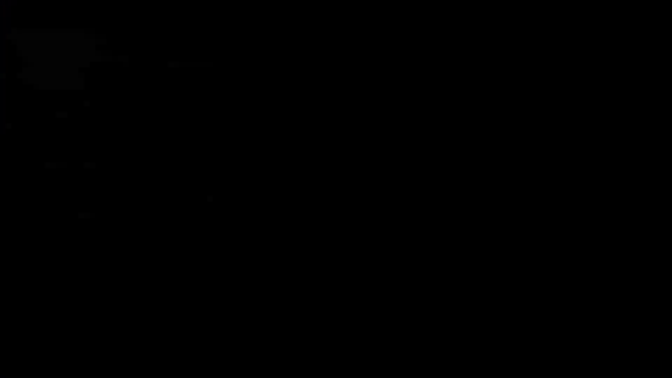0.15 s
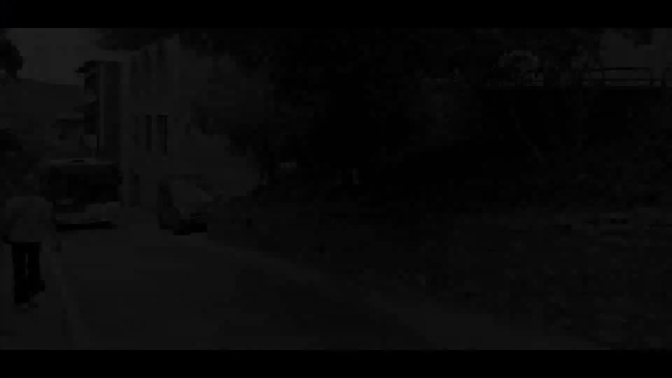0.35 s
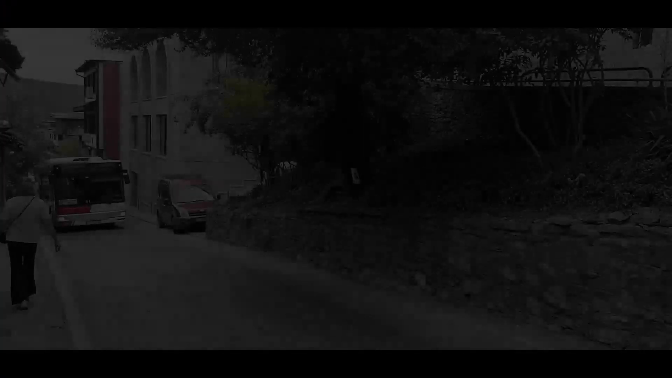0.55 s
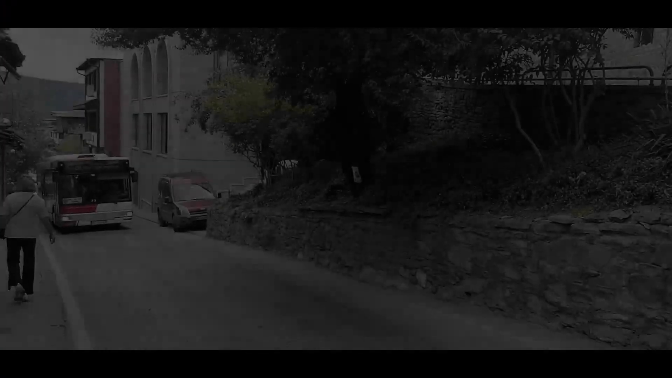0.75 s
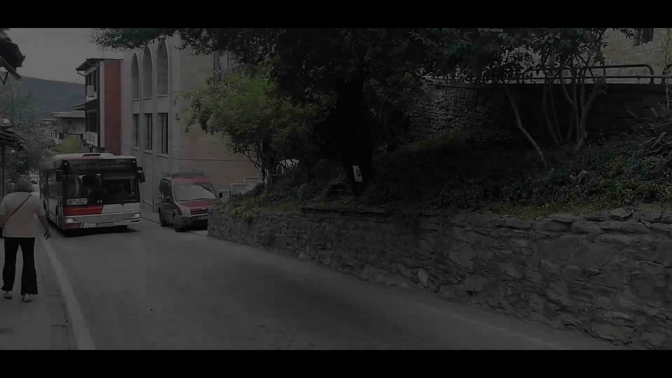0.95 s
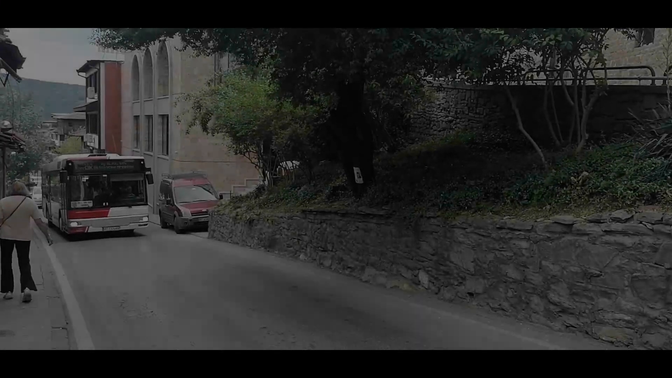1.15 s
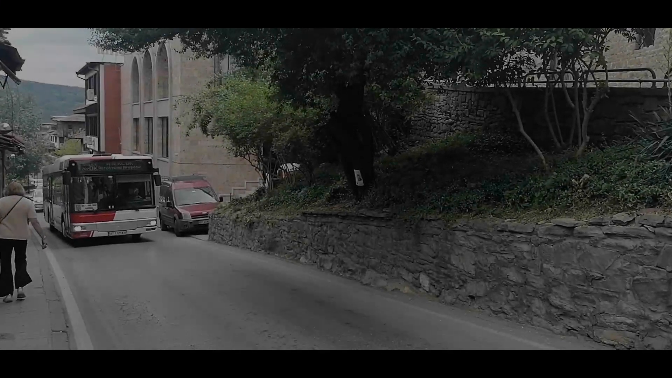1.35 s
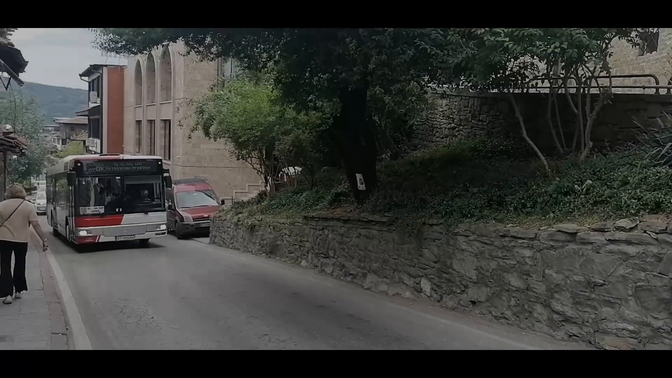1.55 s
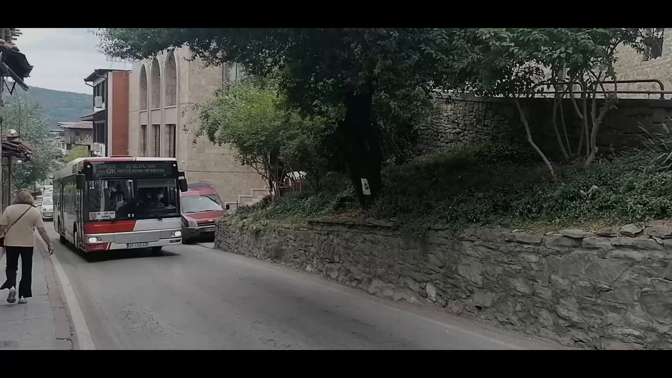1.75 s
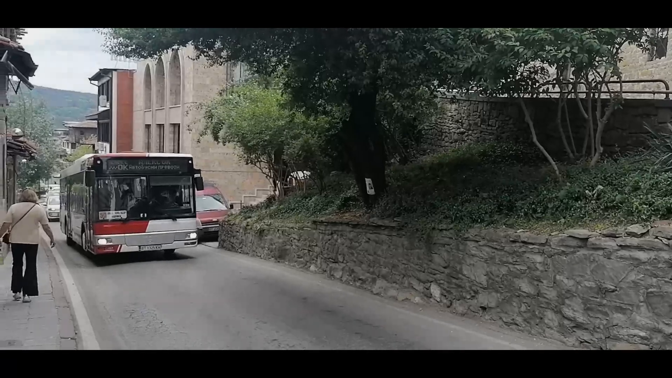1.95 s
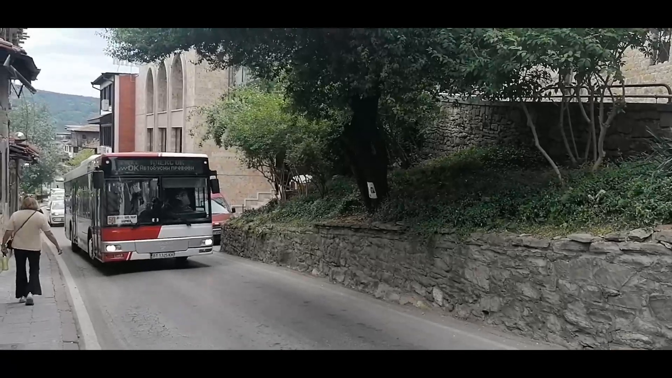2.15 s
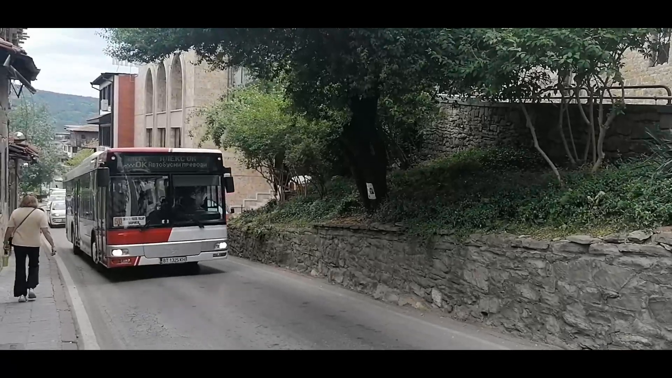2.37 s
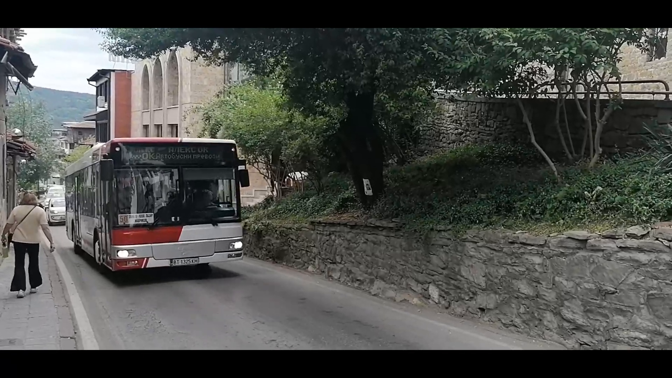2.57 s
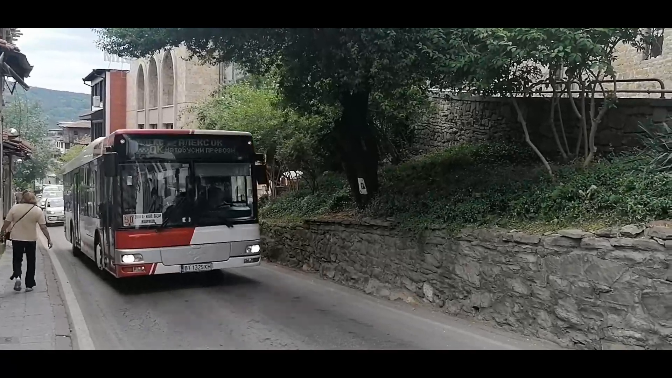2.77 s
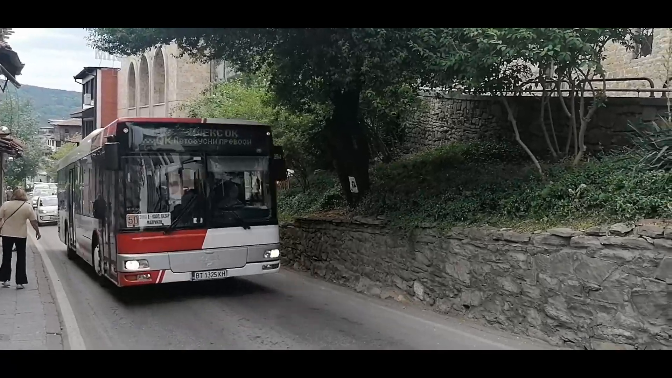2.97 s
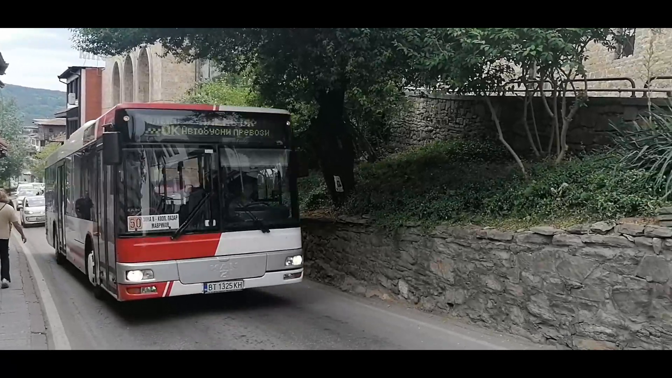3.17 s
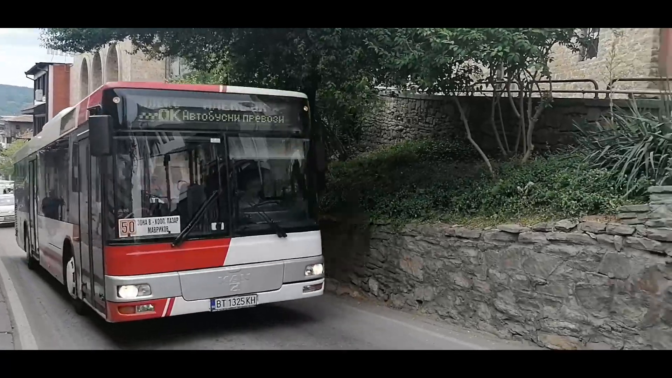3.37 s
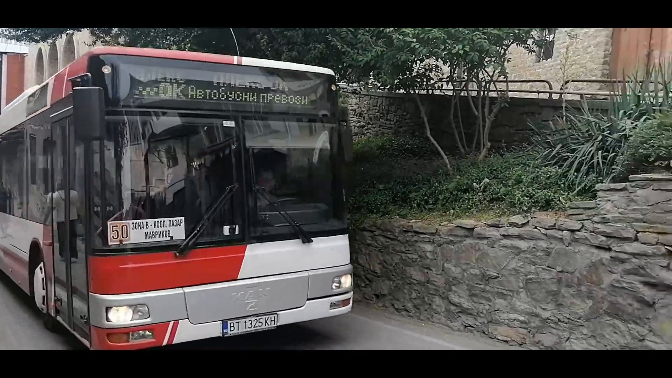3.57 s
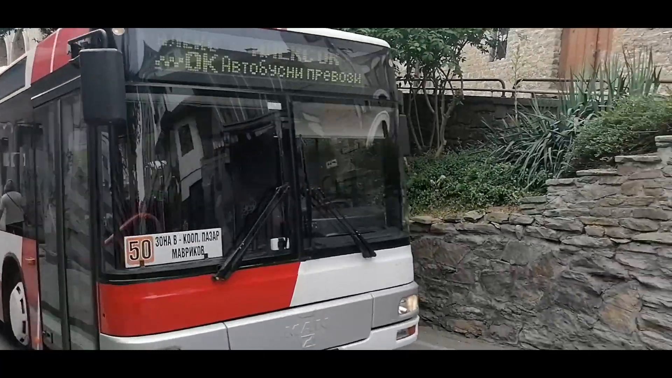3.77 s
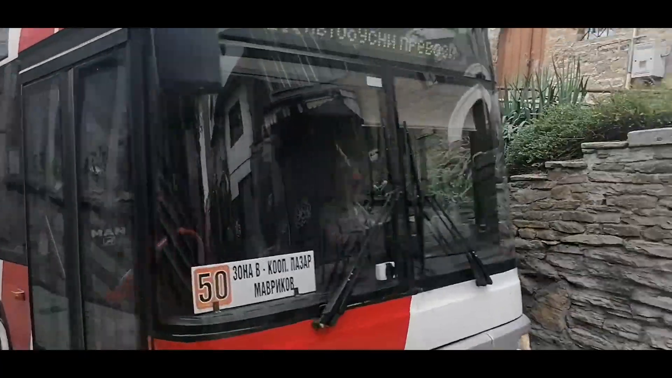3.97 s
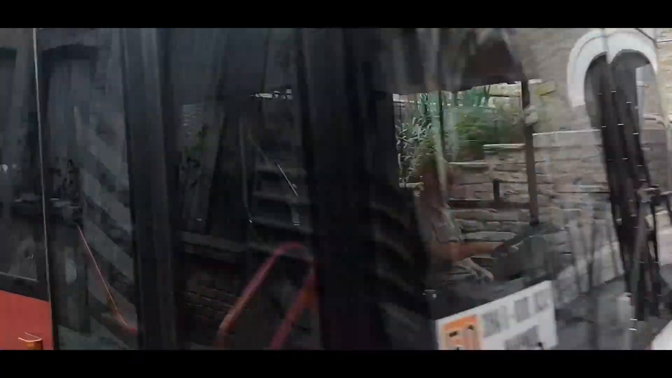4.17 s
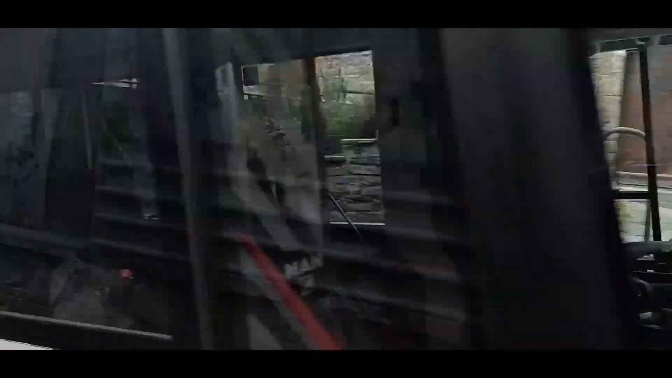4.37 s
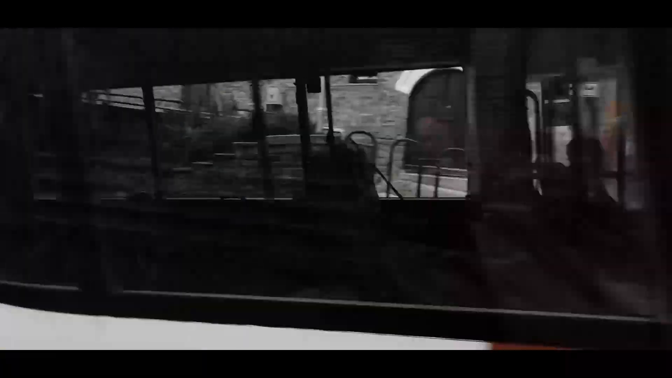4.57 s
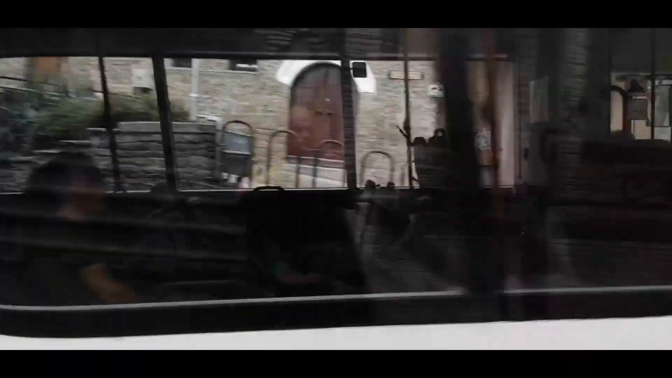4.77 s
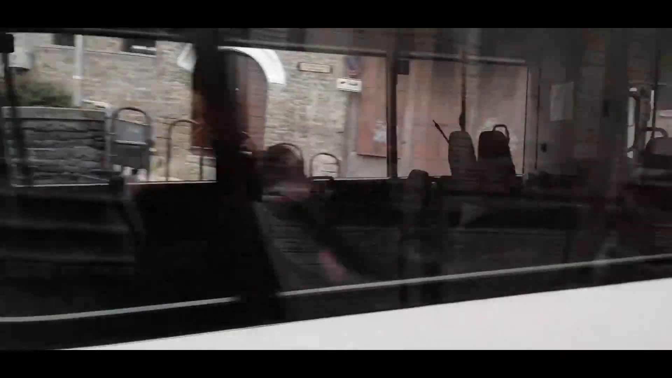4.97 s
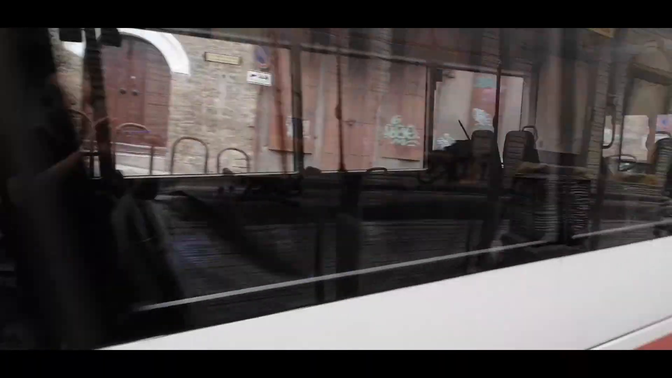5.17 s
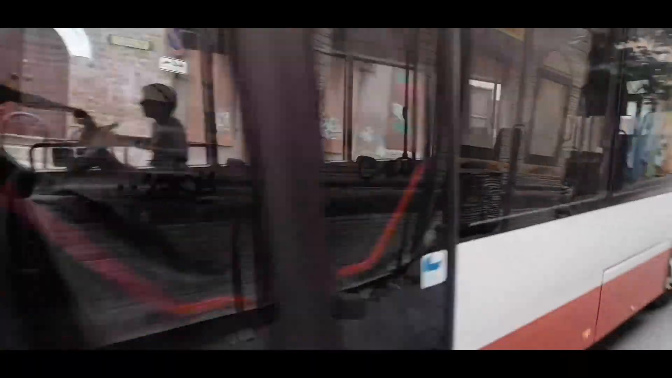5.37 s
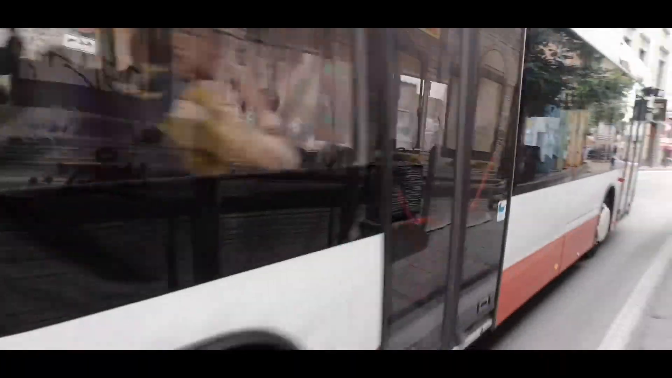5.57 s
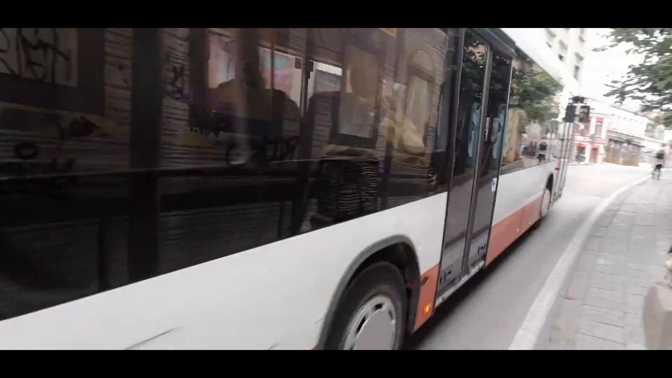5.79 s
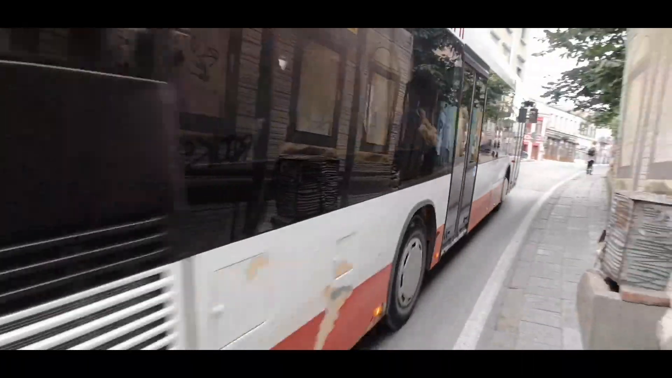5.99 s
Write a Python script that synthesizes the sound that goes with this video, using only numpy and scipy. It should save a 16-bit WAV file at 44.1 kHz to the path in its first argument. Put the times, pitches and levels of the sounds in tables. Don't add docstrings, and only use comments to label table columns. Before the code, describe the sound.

The sound begins in silence and fades in over about two seconds. A diesel bus is heard some way ahead on a narrow street with stone walls: a low uneven engine throb, a mid-low gear whine that flutters and drops out as echoes shift, soft tyre rumble, airy intake hiss and a very faint high whistle around 0.9. Revs climb slowly until about 2.3; small stone knocks tick at 1.5 and 1.7. Around 2.7 it changes up and the engine note drops, then holds steady. At 3.7 an air valve cracks, spits and bleeds off briefly. From 4 the flank is alongside: wide, loud tyre roar, hollow underbody resonances and brief panel singing, with a sharp stone knock at 4.6. From 5.2 cooling-fan wash grows, joined by a low boom at 5.5 as the rear passes. It stops at 6 while still loud. Close stereo pavement microphone, lightly reverberant.

```python
import sys
import numpy as np
from scipy import signal
from scipy.fft import rfft, irfft, next_fast_len
from scipy.io import wavfile
from scipy.ndimage import uniform_filter1d

SR = 44100
rng = np.random.default_rng(int(sys.argv[2]) if len(sys.argv) > 2 else 0)


def gain_from_decibels(decibels):
    exponent = np.asarray(decibels, float) / 20
    return 10 ** exponent


def master(y):
    cut = np.clip(np.atleast_2d(y).T, -1, 1)
    pcm = np.round(cut * 32767)
    wavfile.write(sys.argv[1], SR, pcm.astype(np.int16))


N = 265923
T = np.arange(N) / SR
SIZE = next_fast_len(N + 64)
HZ = np.maximum(np.arange(SIZE // 2 + 1) * SR / SIZE, 1)
ARRIVE_S, ARRIVE_LENGTH_S = 3.95, .5
FAR = np.clip(.5 - (T - ARRIVE_S) / ARRIVE_LENGTH_S, 0, 1)


def columns(table):
    s, *rest = np.transpose(table)
    return [np.interp(T, s, c) for c in rest]


def on_log(table, hz):
    f, v = np.transpose(table)
    return np.interp(np.log(hz), np.log(f), v)


def humps(table):
    s, half, *rest = np.transpose(table)
    bells = np.exp(-((T - s[:, None]) / half[:, None]) ** 2)
    return [c @ bells for c in rest]


def walk(rate_hz):
    k = int(SR / rate_hz)
    held = np.repeat(rng.standard_normal(N // k + 1), k)
    return 1.3 * uniform_filter1d(uniform_filter1d(held, k), k)[:N]


# (frequency [Hz], correlation [0-1])
PORT_LIKENESS = [(60, .98), (300, .96), (500, .82), (750, .78), (1000, .56), (1650, .6), (2100, .33),
                 (2450, .42), (3000, .22), (4000, .12), (15000, .1)]


def band(shape):
    used = np.flatnonzero(shape > 1e-4 * np.max(shape))
    left, other = (rng.standard_normal((2, len(used), 2)) @ [1, 1j]) * shape[used]
    like = np.clip(on_log(PORT_LIKENESS, HZ[used]), 0, 1)
    pair = np.zeros((2, len(HZ)), complex)
    pair[0, used] = left
    pair[1, used] = like * left + np.sqrt(1 - like ** 2) * other
    pair = irfft(pair, SIZE)[:, :N]
    return pair / pair[0].std()


def tone(turns, db, waver_db, slip_turns, rate_hz):
    level = np.sqrt(2) * gain_from_decibels(db + waver_db * walk(rate_hz))
    return level * np.sin(2 * np.pi * (turns + slip_turns * walk(rate_hz) + rng.random()))


def bursts(table):
    out = 0
    for s, rise_s, decay_s, hz, width_hz, db in table:
        swell = np.clip((T - s) / rise_s, 0, 1) * np.exp(-np.maximum(T - s - rise_s, 0) / decay_s)
        out = out + gain_from_decibels(db) * swell * band(np.exp(-((HZ - hz) / width_hz) ** 2))
    return out


def shifted():
    shift_s, length_s = 2.7, .53
    return np.clip((T - shift_s) / length_s + .5, 0, 1)


# (time [s], firing rate [Hz])
REVS = [(0.2, 74.4), (1.3, 82.3), (2.25, 84.7), (2.45, 82.2), (2.9, 68.2), (3.1, 67.7), (4.5, 69),
        (5.1, 69), (5.9, 67)]
# (time [s], level [dB])
FIRING = [(.2, -39), (.7, -39.5), (1, -41.5), (1.35, -38), (1.65, -42.5), (2.25, -32), (2.95, -38.5),
          (3.4, -34), (3.6, -36), (3.85, -33), (4.8, -33), (5, -33.5), (5.2, -31), (5.4, -35), (5.75, -37),
          (6, -40)]
# (multiple of firing rate, level in low gear [dB], level in high gear [dB])
EXHAUST = [(1 / 3, -18, -8), (2 / 3, -9, -7), (1, 2, 2), (4 / 3, -8, -12), (3 / 2, -5, -14),
           (5 / 3, -12, -13), (2, -7, -1), (3, -5, -13)]
# (time [s], half length [s], level [dB])
THROB_GAPS = [(.58, .04, -8), (.9, .04, -6), (1.12, 0.044, -9), (1.53, 0.037, -12), (1.88, 0.045, -10),
              (2.12, 0.032, -8), (2.3, 0.11, 1.5), (3.05, 0.11, -3), (3.35, .1, 3), (3.55, .05, -8),
              (3.75, .1, 1.5), (4.02, .03, -6), (4.95, 0.11, -4), (5.2, .06, 2.5), (5.45, .1, -5)]


def exhaust():
    (hz,), (db,) = columns(REVS), columns(FIRING)
    turns = np.cumsum(hz) / SR
    after = shifted()
    db = db + humps(THROB_GAPS)[0]
    out = 0
    for k, low_db, high_db in EXHAUST:
        order_db = db + low_db + after * (high_db - low_db)
        out = out + tone(k * turns, order_db, waver_db=1.5, slip_turns=.035, rate_hz=9)
    return out, turns


# (time [s], gain re closest point [dB])
APPROACH = [(0, -19.5), (.6, -21), (1.2, -19.5), (1.6, -18.5), (2.05, -17), (2.4, -16), (2.75, -15.5),
            (3.2, -13), (3.85, -8.5), (4.2, -6.5), (4.8, -4), (5.05, -4), (5.3, -2), (5.6, -1.5), (6.03, 0)]
# (time [s], gear mesh rate [Hz])
MESH_RATE = [(.2, 224), (1.05, 248), (1.5, 256.2), (2, 262.6), (2.5, 266), (3.6, 267.5), (4.7, 269.7),
             (5.55, 270), (6.03, 267.2)]
# (time [s], half length [s], level [dB])
WHINE = [(.55, 0.14, -14), (.3, 0.046, 9), (.74, .05, 5), (.86, .04, -12), (.96, 0.06, 2), (1.12, 0.045, 7),
         (1.2, .04, -8), (1.45, 0.12, -6), (2.25, 0.12, -20), (2.6, 0.076, -16), (1.65, .06, -1.5),
         (1.85, 0.046, 4.5), (2.02, 0.053, -0.5), (2.78, 0.079, 4), (2.97, 0.039, -16), (3.17, 0.098, -10),
         (3.3, 0.9, 5.5), (3.46, 0.027, -26), (3.6, 0.016, -10), (3.75, .06, 1.5), (3.93, 0.083, -17),
         (4.2, 0.13, -6.5), (4.36, 0.077, 0.5), (4.5, 0.11, -4), (4.72, 0.091, -33), (4.9, 0.033, 3),
         (5.05, 0.065, 7), (5.14, 0.035, -10), (5.25, 0.037, 4), (5.4, 0.068, -21), (5.6, 0.072, 2),
         (5.675, .015, -6), (5.72, .04, 6), (5.79, .025, -7), (5.835, .015, 8), (5.88, 0.092, -6),
         (6, 0.042, -3.5)]
# (multiple of mesh rate, level far ahead [dB], level alongside [dB])
MESH = [(2, -5, -3), (3, -9, 0), (3.7, -15, -8), (4, -13, -7), (5, -11, -18), (5.5, -8, -9), (6, -17, -8),
        (7, -9, -14), (8, -22, -14), (9, -14, -20), (10, -24, -14), (12, -30, -20)]
# (time [s], half length [s], overtones [dB], half-rate hum [dB])
OVERTONES = [(.5, .2, 0.5, -4), (.85, .15, 3.5, 0), (1.4, 0.17, -9, -2), (2.2, 0.22, 4, -9),
             (2.85, 0.23, 5, -1), (3.6, 0.2, -14, 22.5), (6.03, 0.78, 2, 17)]
# (time [s], half length [s], extra phase slip [turns])
SMEAR = [
    (4.3, .35, .1),
    (5.85, .2, .05),
]


def driveline(firings):
    (hz,), (gain_db,), (over_db, hum_db) = columns(MESH_RATE), columns(APPROACH), humps(OVERTONES)
    whine_db = -18 + .99 * gain_db + humps(WHINE)[0]
    over_db = over_db - 32.5 + .84 * gain_db
    hum_db = hum_db - 48.5 + gain_db
    turns = np.cumsum(hz) / SR
    sag_from_s, sag_slip_per_s = 5.6, .2
    slip = .12 + humps(SMEAR)[0] + sag_slip_per_s * np.maximum(T - sag_from_s, 0)
    throb = 1 + .22 * np.cos(2 * np.pi * firings / 3)
    out = throb * tone(turns, whine_db - .5, waver_db=2.4, slip_turns=slip, rate_hz=22)
    out = out + tone(turns / 2, hum_db, waver_db=2.5, slip_turns=.05, rate_hz=9)
    for k, far_db, near_db in MESH:
        slip = .08 + .022 * k * (.9 + FAR)
        db = over_db + near_db + FAR * (far_db - near_db)
        out = out + tone(k * turns, db, waver_db=3.5, slip_turns=slip, rate_hz=22 + 2 * k)
    return out


# (time [s], half length [s], rumble [dB], body boom [dB])
ROAR = [(.2, .05, 7, -5), (.32, .04, -3, -4), (.57, .05, -7, 2), (.78, .08, -1, 1), (.92, .05, -3, 0.5),
        (1.15, 0.38, -6, 0.5), (1.17, 0.065, 1, 3.5), (1.32, 0.037, 4, 1.5), (1.55, .04, -3, 2),
        (1.65, .05, 7, -2), (1.97, .04, 7, -1), (2.09, .03, -7, 3), (2.48, .04, -6, 3),
        (2.8, 0.055, -0.5, 2), (3.17, .06, -8, 1), (3.35, .05, 1, 0), (3.85, 0.071, 0, 0),
        (4.7, 0.11, -1.5, -1.5), (5.15, 0.031, -2, 0.5), (5.75, 0.1, 4, 2), (1.45, 0.088, 11, -0.5),
        (2.15, 0.11, 6.5, -0.5), (2.63, 0.036, 4, -0.5), (2.97, 0.21, 5, -1), (3.6, 0.069, -9, 1),
        (4.5, 0.47, 8, -2.5), (5.23, 0.044, -5, -1), (5.42, 0.023, -11, 2), (5.55, 0.049, 10, -1.5),
        (5.91, 0.014, 10, 3)]
ROAR_CENTRES_HZ = [30, 90, 300, 1400, 7000, 13000]
ROAR_FOLLOWS = [0.84, 0.3, 1.13, 0.88, 0.83, 1.05]
# (frequency [Hz], density [dB per Hz])
ROAR_COLOUR = [(20, -8), (60, -9), (130, -3.5), (300, 0.5), (430, -6.5), (610, -8), (780, -10),
               (1300, -14.5), (1500, -13.5), (1750, -18), (2000, -17.5), (2500, -21), (2800, -23.5),
               (3200, -26), (4200, -34), (7400, -39), (10000, -44), (13000, -62.5), (15200, -64)]
# (frequency [Hz], level [dB])
ROAR_FAR = [(60, 0.8), (300, 3), (430, -4), (520, -1.5), (620, -1), (800, 1), (1100, -3), (1400, 1),
            (1750, -2), (2400, -2.5), (3500, -2), (5000, -4.5), (6200, -4), (7500, -2), (11000, -1)]


def roar(firings):
    boom_after_shift_db, grille_s, grille_db_per_s = 1, 5.05, 5.5
    curves = np.outer(ROAR_FOLLOWS, columns(APPROACH)[0])
    curves[1:3] += humps(ROAR)
    curves[2] += boom_after_shift_db * shifted()
    curves[4:] += grille_db_per_s * np.maximum(T - grille_s, 0)
    curves -= curves[:, N // 2:].mean(1, keepdims=True)
    out, swell, flicker = 0, walk(12), walk(10)
    for hz in 20 * 2 ** (np.arange(40) / 4):
        window = np.clip(1 - np.abs(4 * np.log2(HZ / hz)), 0, 1) ** .5
        shape = window * gain_from_decibels(on_log(ROAR_COLOUR, HZ))
        place = np.interp(np.log(hz), np.log(ROAR_CENTRES_HZ), np.arange(len(curves)))
        k = min(int(place), len(curves) - 2)
        db = curves[k] + (place - k) * (curves[k + 1] - curves[k]) + FAR * on_log(ROAR_FAR, hz)
        flicker = .7 * flicker + .7 * walk(9)
        db = db + .3 * swell + .7 * flicker
        clatter = 1 + .03 * min(hz / 3000, 1) * np.cos(2 * np.pi * firings)
        out = out + np.sqrt(np.mean(shape ** 2)) * gain_from_decibels(db) * clatter * band(shape)
    return gain_from_decibels(-16) * out / out[0, N // 2:].std()


# (time [s], rise [s], decay [s], centre [Hz], width [Hz], level [dB])
PUFFS = [
    (.1, 1.84, 1.5, 4990, 1097, -57.5),
    (2.25, .08, 0.11, 11000, 4000, -67),
    (3.41, 0.018, .04, 9800, 3500, -63),
    (3.701, .0005, .0015, 11500, 5500, -45),
    (3.704, .001, .005, 8900, 2000, -40),
    (3.71, .02, .2, 9950, 2970, -57),
    (5.2, 0.73, 1.5, 3020, 444.6, -32.5),
    (5.5, 0.3, 1.5, 233.7, 21.75, -22),
]


def air_puffs():
    return bursts(PUFFS)


# (time [s], rise [s], decay [s], centre [Hz], width [Hz], level [dB])
HOLLOWS = [(1.8, 0.45, 1.6, 1380, 46, -43.5), (1.9, 0.43, 0.77, 1930, 60, -47),
           (2.74, 0.71, 2.9, 2470, 90, -47), (0.24, 0.04, 0.03, 225, 12, -32),
           (0.19, 0.17, 0.25, 115, 20, -29), (3.9, 0.32, 0.17, 215, 25, -30),
           (.2, .3, 0.58, 1000, 150, -41.5), (0.42, .2, 1.4, 800, 50, -42),
           (3.03, 0.15, 0.25, 370, 35, -31.5), (3.8, 0.086, .08, 380, 19, -35),
           (3.91, 0.25, 0.46, 800, 45, -33), (4.55, 0.25, 0.18, 420, 55, -23),
           (4.3, 0.13, 0.091, 760, 25, -31), (5.35, 0.27, 0.39, 480, 25, -22),
           (5.6, 0.17, .5, 760, 35, -25), (4.1, .15, .15, 3700, 150, -46), (0.15, .03, 0.055, 240, 80, -35),
           (1.214, 0.104, .1, 280, 25, -34), (2.62, 0.22, 0.24, 535, 14, -39),
           (1.84, 0.21, 0.36, 620, 40, -39), (1.57, 0.15, 0.12, 180, 18, -32),
           (2.7, 0.24, 0.14, 185, 20, -29), (2.56, .2, 0.82, 2450, 40, -50.5), (5, .1, .1, 730, 40, -27),
           (4.0, .1, .3, 1700, 83, -35), (5.75, 0.12, .3, 215, 25, -22), (0.65, .3, .3, 8700, 250, -77),
           (4.08, .08, .1, 810, 36, -29), (0.62, 0.16, .1, 110, 19, -28), (2.31, 0.092, .5, 500, 30, -37.5),
           (3.02, .15, .3, 680, 25, -40.5)]


def hollows():
    return bursts(HOLLOWS)


# (time [s], whistle [Hz], level [dB])
TURBINE = [(.4, 8900, -86), (.7, 9200, -78), (.87, 9500, -72), (1.0, 9750, -80), (1.3, 10400, -81),
           (1.7, 11000, -84), (2.0, 11100, -100)]


def turbine():
    hz, db = columns(TURBINE)
    return tone(np.cumsum(hz) / SR, db, waver_db=4, slip_turns=.35, rate_hz=400)


# (time [s], rise [s], decay [s], centre
# [Hz], width [Hz], level [dB])
SIDEBANDS = [(3.0, 0.25, 0.63, 305, 18, -29.5), (3.85, 0.051, .06, 300, 30, -25),
             (4.15, 0.13, 0.17, 295, 16, -24.5), (4.5, 0.079, 0.095, 232, 10, -25),
             (4.8, 0.11, .15, 310, 20, -25), (5.4, 0.085, .25, 310, 25, -24), (2.6, .1, .3, 538, 4, -38.5),
             (4.85, 0.096, 0.31, 810, 7.7, -35), (4.9, .1, .15, 540, 11, -30), (4.1, .1, .15, 550, 20, -35),
             (2.55, .08, .12, 2200, 25, -51), (2.95, 0.079, .15, 2600, 20, -52),
             (3.45, .08, .1, 2480, 25, -49), (5.2, .08, 0.102, 2400, 20, -34),
             (5.05, 0.093, 0.14, 680, 20, -33), (3.702, .0005, .006, 6000, 1500, -46),
             (2.45, .1, .12, 93, 6, -31), (5.45, .1, .4, 133, 6, -26), (5.3, 0.14, .15, 182, 8, -26.5),
             (5.2, 0.086, .2, 2700, 10, -43), (5.5, .06, .08, 2260, 15, -40), (5.25, .06, .06, 1920, 22, -37),
             (5.45, .1, 0.22, 2440, 20, -37), (1.9, .08, 0.16, 128, 7, -35), (5.8, .1, .15, 228, 8, -21),
             (2.85, .1, .1, 180, 25, -31), (.65, .15, .2, 120, 6, -29), (2.6, .3, 1.0, 2450, 12, -50),
             (4.55, .08, .2, 390, 12, -29)]


def sidebands():
    return bursts(SIDEBANDS)


# (time [s], rise [s], decay [s], centre [Hz], width [Hz], level [dB])
STONES = [
    (1.469, .001, .004, 800, 500, -27),
    (1.721, 0.00081, 0.0037, 800, 502, -26),
    (4.635, 0.0013, 0.0035, 900, 402, -12.5),
]


def stones():
    return bursts(STONES)


def street(x):
    t60_s, scatter_db = .4, -12
    tail = band(np.ones(len(HZ)))[:, :SR // 2] * gain_from_decibels(-60 * T[:SR // 2] / t60_s)
    tail /= np.sqrt(np.sum(tail[0] ** 2))
    return x + gain_from_decibels(scatter_db) * signal.fftconvolve(x[None], tail, axes=1)[:, :N]


def scene():
    engine, firings = exhaust()
    whines = street(gain_from_decibels(2.5) * (driveline(firings) + turbine()))
    out = gain_from_decibels(2.5) * engine + whines + roar(firings)
    return out + air_puffs() + hollows() + sidebands() + stones()


def top_cut(x):
    return signal.sosfilt(signal.butter(12, 15070, fs=SR, output="sos"), x)


# (frequency [Hz], width [Hz], level [dB])
PORT_NOTCH = (8300, 280, -4)
# (frequency [Hz], left minus right [dB])
PORT_BALANCE = [(60, 7), (500, 10), (860, 7), (1200, 3), (1550, 5.5), (2300, 0), (3600, 0), (5000, -4),
                (7000, 0), (9400, 5), (10800, 0), (15000, 0)]
# (frequency [Hz], loss [dB])
PORT_SHADE = [(900, 0), (1300, 3), (1600, 2), (2200, 7), (2800, 5), (3100, 0)]
# (frequency [Hz], phase [rad])
PORT_LEAD = [(60, 0), (350, .55), (800, 1), (1300, .7), (1900, 1), (2400, 0)]


def record(dry):
    lag_samples = 18
    fade_from_s, fade_s, fade_bend = .16, 1.99, .94
    hz, width_hz, db = PORT_NOTCH
    notch = gain_from_decibels(db * np.exp(-((HZ - hz) / width_hz) ** 2))
    left, right = rfft(np.pad(dry, ((0, 0), (0, SIZE - N)), "reflect")) * notch
    phase = on_log(PORT_LEAD, HZ) - 2 * np.pi * HZ * lag_samples / SR
    right = right * gain_from_decibels(-on_log(PORT_BALANCE, HZ)) * np.exp(1j * phase)
    shaded = right * gain_from_decibels(-on_log(PORT_SHADE, HZ))
    left, right, shaded = irfft([left, right, shaded], SIZE)[:, :N]
    fade = np.clip((T - fade_from_s) / fade_s, 0, 1) ** fade_bend
    x = np.array([left, right + FAR * (shaded - right)]) * fade
    mix = x / (1 + (x / 1.05) ** 6) ** (1 / 6)
    return top_cut(mix)


dry = scene()
out = record(dry)
master(out)
```